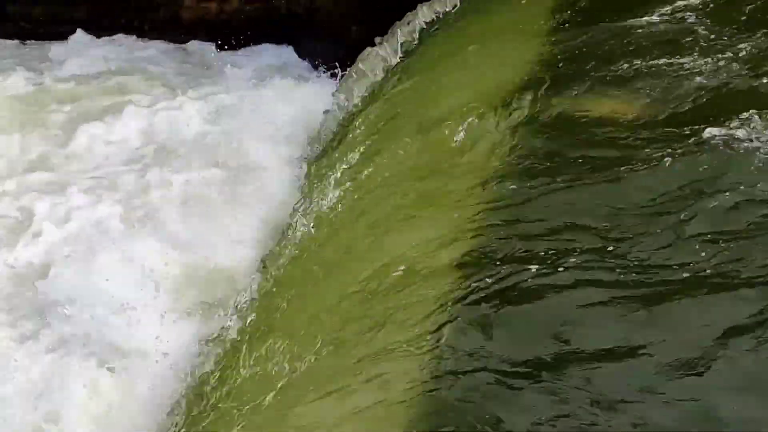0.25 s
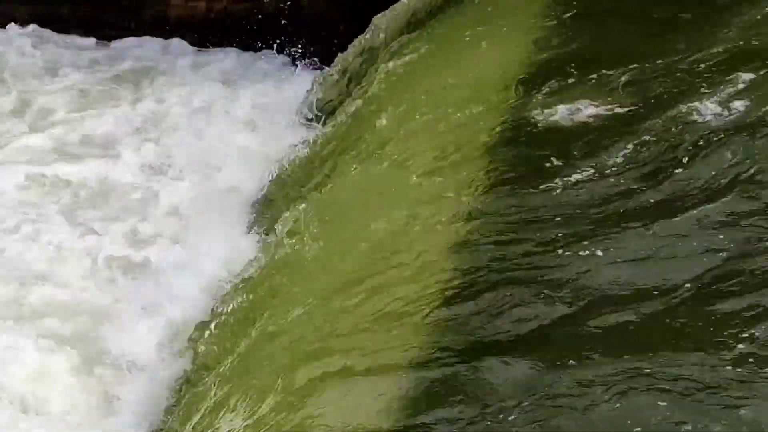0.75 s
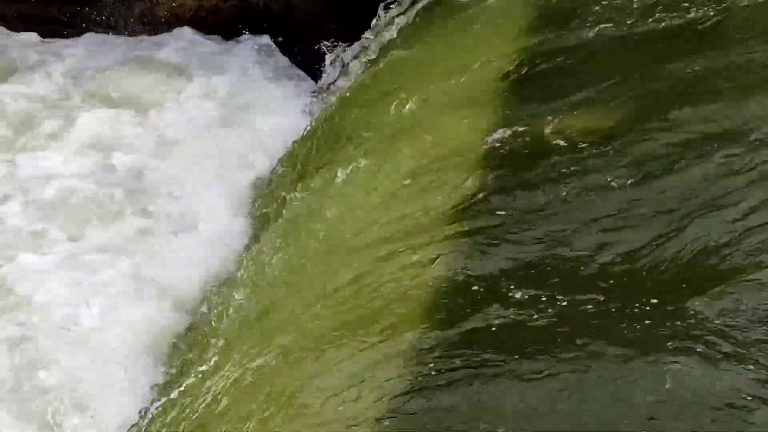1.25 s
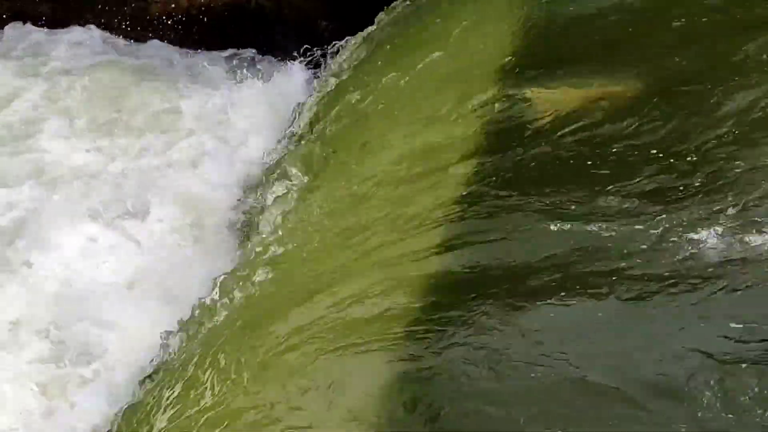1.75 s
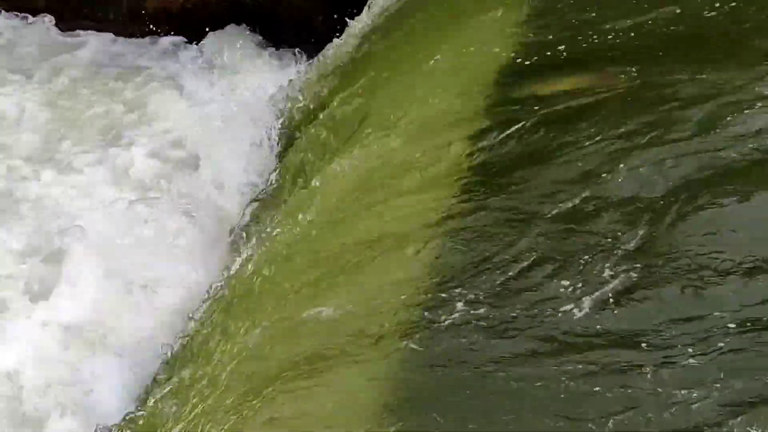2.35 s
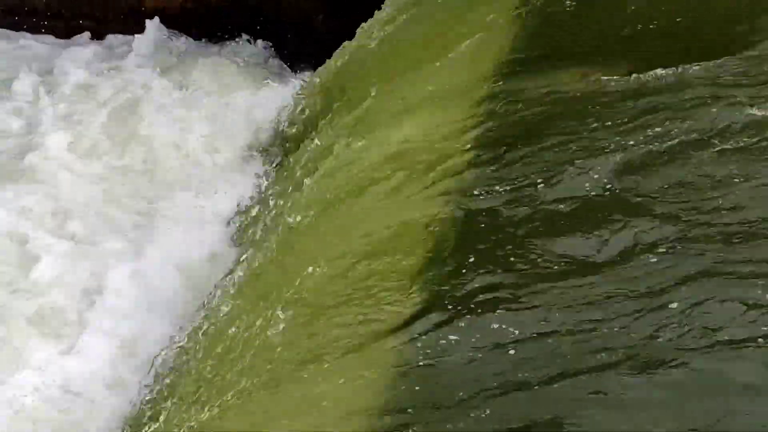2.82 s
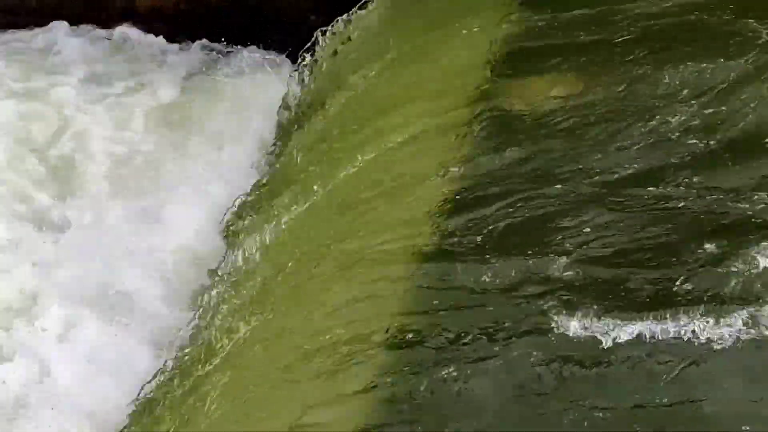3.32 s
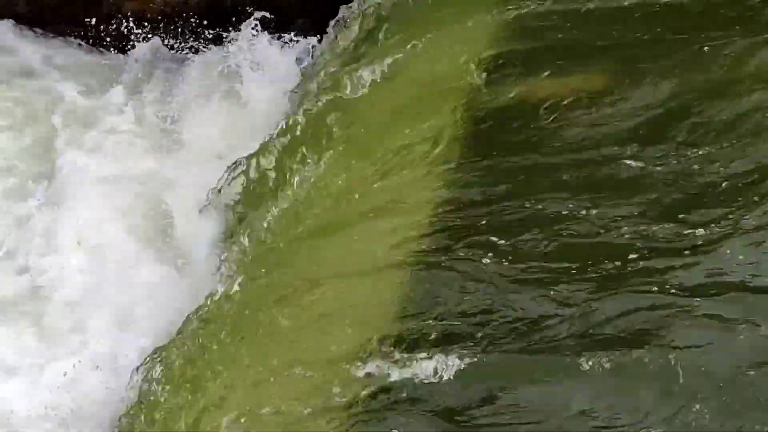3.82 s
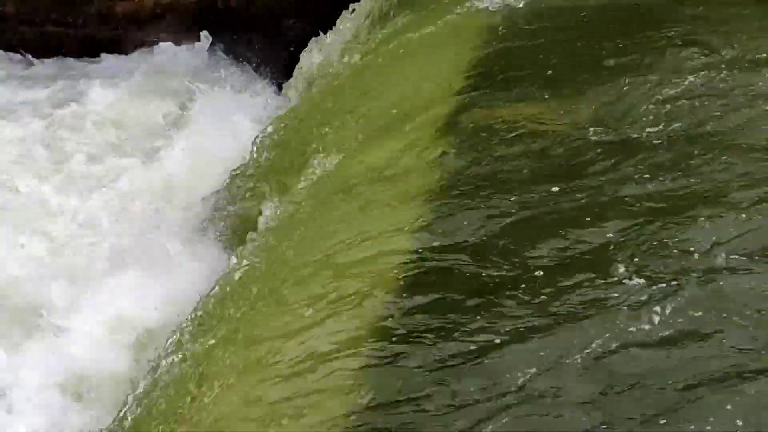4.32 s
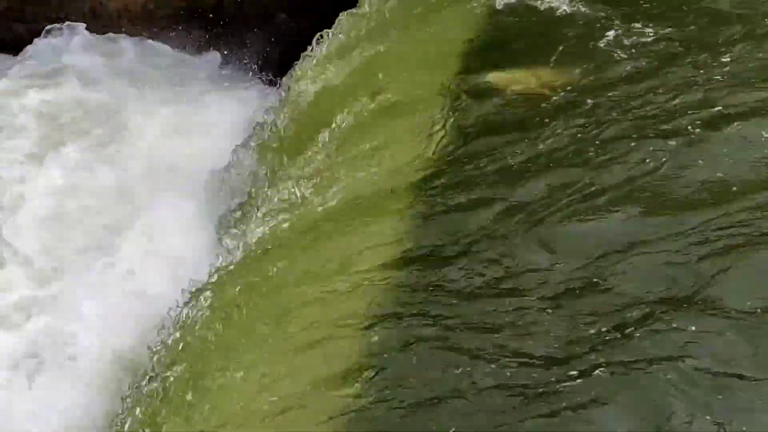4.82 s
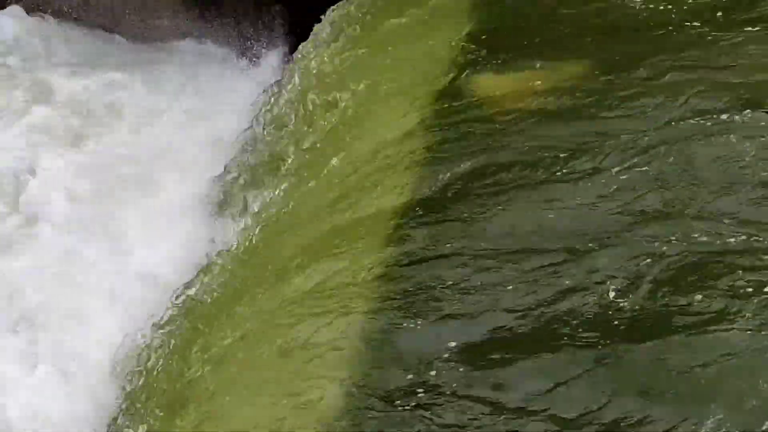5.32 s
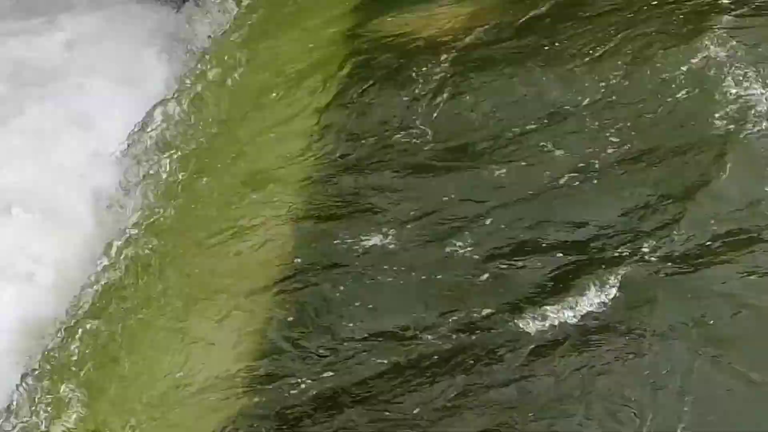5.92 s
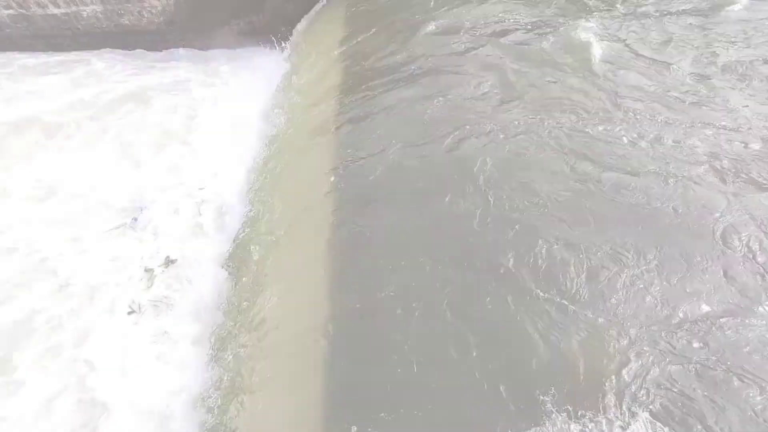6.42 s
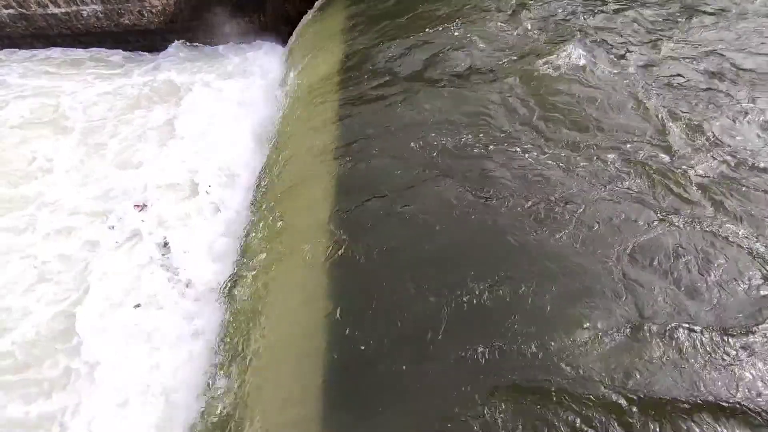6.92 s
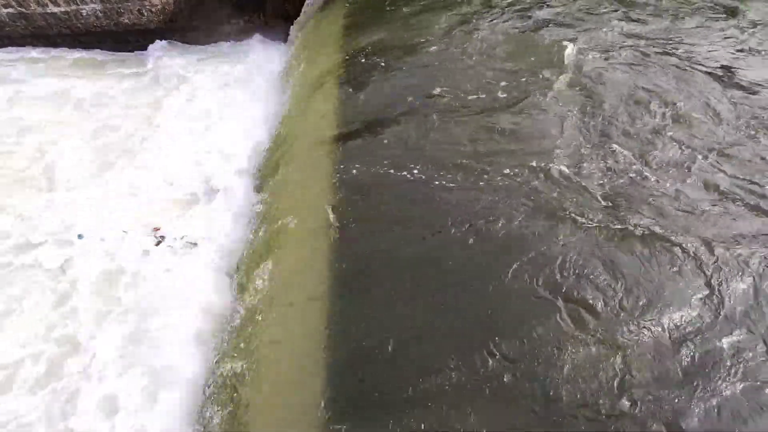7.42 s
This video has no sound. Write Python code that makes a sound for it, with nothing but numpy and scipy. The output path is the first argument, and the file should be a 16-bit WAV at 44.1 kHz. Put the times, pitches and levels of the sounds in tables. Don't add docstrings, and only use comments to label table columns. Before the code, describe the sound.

Water pours heavily into a foaming pool, rumbling low with faint hiss; it fades to near silence around six seconds, then returns.

```python
import sys
import numpy as np
from scipy import signal
from scipy.fft import rfft, irfft, next_fast_len
from scipy.io import wavfile
from scipy.ndimage import uniform_filter1d, minimum_filter1d

SR = 44100
rng = np.random.default_rng(int(sys.argv[2]) if len(sys.argv) > 2 else 0)


def invert_db(x):
    u = np.asarray(x, float) / 20
    return 10 ** u


def unload_audio(sound):
    columns = np.transpose(np.atleast_2d(sound))
    steps = np.round(np.clip(columns, -1, 1) * 32767)
    wavfile.write(sys.argv[1], SR, steps.astype(np.int16))


N = 337806
CUT_S, FADE_S, OVERLAP_S = 6.328, 0.55, 0.013
END = round((CUT_S + OVERLAP_S) * SR)
START = round((CUT_S - OVERLAP_S) * SR)


def rms_one(x):
    return x / np.sqrt(np.mean(x ** 2) + 1e-20)


def at_hz(points, hz):
    points = np.array(points)
    return np.interp(np.log(hz), np.log(points[:, 0]), points[:, 1])


def drift(rate_hz, size):
    step = 40
    r = np.exp(-2 * np.pi * rate_hz * step / SR)
    noise = rng.standard_normal(size // step + 2002)
    slow = signal.lfilter([1], [1, -2 * r, r * r], noise)[2000:]
    return np.interp(np.arange(size) / step, np.arange(len(slow)), rms_one(slow))


def splashes(size, per_s, spread_db, length_s):
    sizes = invert_db(spread_db * np.minimum(rng.exponential(1, size), 4.0))
    landed = rng.random(size) < per_s / SR
    r = np.exp(-1 / (length_s * SR))
    bursts = signal.lfilter([1], [1, -r], sizes * landed + 1e-18)
    return bursts / bursts.mean()


# start_s [s], force of the falling sheet force_db [dB], how deep it drives air depth_db [dB]
PLUNGE = [(0.0, -3, 2), (0.42, 3, -1.5), (0.62, -0.5, -3.5), (0.9, -3, -1.5), (1.5, -3, -4), (1.9, -2, -3),
          (2.4, -3, -1.1), (2.75, 1, -3.5), (3.5, -0.5, 0), (3.9, 1, -0.1), (4.3, 1.1, 2.5),
          (4.65, 2.3, 2.5), (5.1, 0, 1), (5.55, 1.5, 3), (6.2, 2, 6.5), (6.8, 1, 1.5), (7.15, 3.5, 5),
          (7.66, 2.8, 5)]
# near_db [dB], wide_db [dB], force_share [ratio], depth_share [ratio]
VOICES = [
    (-24.5, -26.5, 0.66, 0.78),
    (-15, -17, 0.86, 0.17),
    (-25.5, -24.5, 0.27, -0.58),
    (-34, -35, .05, -0.12),
]


def part_levels(spot):
    start_s, force_db, depth_db = np.transpose(PLUNGE)
    levels = [row[spot] + row[-2] * force_db + row[-1] * depth_db for row in VOICES]
    return np.transpose([start_s] + levels)


# peak_s [s], lift_db [dB], half_length_s [s]
BOILS = [(0.223, 1.5, 0.07), (1.33, 0, 0.13), (1.85, -1, .1), (2.304, 0, 0.17), (2.762, 0, 0.057),
         (3.6, .5, .08), (4.163, 0.5, 0.09), (4.876, 0.5, 0.07), (5.3, 0.5, .07), (5.746, 1.5, 0.049),
         (6.388, 2.5, 0.034), (6.517, 1, .06), (7.02, 0.5, .1), (7.624, 1.5, 0.043)]


def boiling(t):
    return sum(lift_db * np.exp(-((t - peak_s) / half_s) ** 2) for peak_s, lift_db, half_s in BOILS)


# low_hz [Hz], high_hz [Hz]
PARTS = [
    (30, 120),
    (120, 350),
    (350, 1300),
    (1300, 7600),
]


def weir(flow, spectrum, start, size, near_db, own_db, splash_share):
    t = (start + np.arange(size)) / SR
    pad = next_fast_len(size)
    hz = np.maximum(np.arange(pad // 2 + 1) * SR / pad, 1)
    colour = invert_db(at_hz(spectrum, hz)) * (hz < 8000)

    landing_power = splashes(pad, per_s=120, spread_db=3.5, length_s=0.0041)
    landing = np.sqrt(1 - splash_share + splash_share * landing_power)
    deep = rfft(rng.standard_normal(pad)) * colour
    splashy = rfft(rng.standard_normal(pad) * landing) * colour

    flow_s, *levels = np.transpose(flow)
    lifts = []
    for (low_hz, high_hz), level_db in zip(PARTS, levels):
        power = 2 * np.sum(colour[(hz > low_hz) & (hz < high_hz)] ** 2) / pad
        lifts.append(np.interp(t, flow_s, level_db) - 10 * np.log10(power))
    lifts = np.array(lifts)

    together = drift(7.7, size)
    regions = [drift(9.4, size) for part in PARTS]
    boil_db = boiling(t)
    heave_db = 0.97 * drift(11, size) + 0.5 * together

    middles = np.log2([85, 200, 600, 1700])
    centres = np.arange(np.log2(30), np.log2(8000), 1 / 3)
    octave = np.clip(np.log2(hz), centres[0], centres[-1])
    out = np.zeros(size)
    for centre in centres:
        shape = np.cos(np.pi / 2 * np.clip(3 * (octave - centre), -1, 1)) ** 2
        weights = np.array([np.interp(centre, middles, row) for row in np.eye(len(PARTS))])
        bright = weights[-1] + 0.54 * weights[-2]
        flicker_db = boil_db + near_db * (weights @ regions) + own_db * drift(26, size)
        swell_db = weights @ lifts + bright * flicker_db + (1 - bright) * heave_db
        source = splashy if bright > 0.3 else deep
        out += invert_db(swell_db) * irfft(source * shape, pad)[:size]
    return out


# pitch_hz [Hz], level_db [dB per Hz]
CLOUD_NEAR = [(20, -39), (27, -38), (40, -27), (68, -9), (110, -4.5), (169, -0.5), (263, -2.5), (330, -6.5),
              (403, -14), (482, -14.5), (618, -19.5), (960, -24), (1040, -27.5), (1220, -30)]
# pitch_hz [Hz], level_db [dB per Hz]
SPRAY_NEAR = [(1390, -39.5), (1690, -31), (1910, -33), (2150, -32.5), (2450, -34.5), (2720, -36.5),
              (2830, -39.5), (3520, -39.5), (3580, -46), (3680, -42.5), (4100, -47), (5150, -40.5),
              (5650, -46), (5840, -43.5), (5900, -38.5), (6900, -33), (7500, -31)]


def near_spot():
    water = weir(part_levels(0), CLOUD_NEAR + SPRAY_NEAR, 0, END, near_db=0.46, own_db=0.53, splash_share=0.097)
    return water * np.minimum(np.arange(END)[::-1] / (FADE_S * SR), 1)


# [dB the gain drops, negative rises]
SURGES = [(0.116, -7, 188, 1), (0.152, -7.5, 192, 0.5), (0.355, -7, 176, 0.5), (0.404, -13, 200, 1),
          (0.580, -5, 234, -2), (0.641, -7.5, 233, 0.5), (0.698, -10.5, 220, 1), (1.814, -7.5, 214, -2),
          (2.723, -5, 243, 0), (2.811, -9, 188, 2), (2.891, -8, 174, 0.5), (3.068, -9.5, 199, -1),
          (3.252, -7, 247, 3), (3.346, -9, 224, 0.5), (3.420, -6, 220, -0.5), (3.494, -5.5, 200, -1),
          (3.665, -13, 200, 1.5), (3.859, -7.5, 187, 2.5), (4.192, -13, 189, -1.5), (4.244, -10, 190, 0),
          (4.295, -8.5, 187, 4), (4.361, -7, 191, 1), (4.617, -15, 149, -1), (4.669, -5, 144, 4.5),
          (4.795, -22, 158, -0.5), (4.915, -7, 170, 0), (5.012, -4.5, 147, 1), (5.117, -7, 170, -1),
          (5.179, -8.5, 180, 0), (5.234, -10.5, 179, 0), (5.327, -9.5, 181, 0), (5.394, -4, 171, 2),
          (5.436, -9, 160, 2), (5.529, -8, 174, 2), (5.569, -4.5, 180, 1.5), (5.812, -9, 147, -0.5),
          (5.861, -6.5, 171, 1.5), (5.9, -12, 149, 1), (6.584, -14, 221, -2.5), (6.709, -9, 190, -2.5),
          (6.739, -11.5, 156, 3), (6.887, -10, 148, 0), (6.907, -7.5, 119, -1.5), (6.99, -6.5, 153, -0.5),
          (7.070, -15, 171, -1.5), (7.15, -11.5, 159, 0), (7.212, -5.5, 145, -2), (7.271, -7.5, 144, 4.5),
          (7.325, -12, 200, 2.5), (7.603, -3, 156, -0.5)]


def thuds():
    out, t = np.zeros(N), np.arange(N) / SR
    for peak_s, level_db, pitch_hz, duck_db in SURGES:
        span = slice(max(int((peak_s - 0.05) * SR), 0), int((peak_s + 0.03) * SR))
        cycles = (t[span] - peak_s) * pitch_hz
        swell = np.exp(-(cycles / np.where(cycles < 0, 1.8, 1.1)) ** 2)
        out[span] += invert_db(level_db) * np.cos(2 * np.pi * cycles) * swell
    return out


# start_s [s], length_s [s], from_hz [Hz], to_hz [Hz], level_db [dB]
BIRD = [
    (3.335, .065, 3400, 3500, -45),
    (3.705, .09, 3100, 3440, -43.5),
]


def bird():
    out = np.zeros(N)
    for start_s, length_s, from_hz, to_hz, level_db in BIRD:
        size, at = int(length_s * SR), int(start_s * SR)
        rise = np.minimum(np.linspace(0, 1.4, size), 1)
        pitch_hz = from_hz + (to_hz - from_hz) * rise
        breath = np.minimum(4 * np.hanning(size), 1)
        out[at:at + size] += invert_db(level_db) * breath * np.sin(2 * np.pi * np.cumsum(pitch_hz) / SR)
    return out


# pitch_hz [Hz], level_db [dB per Hz]
CLOUD_WIDE = [(20, -46.5), (27, -43.5), (40, -23), (68, -5), (110, -3), (160, 0), (263, -3), (330, -9),
              (390, -16.5), (480, -20), (700, -21), (960, -24.5), (1040, -30.5), (1120, -37.5)]
# pitch_hz [Hz], level_db [dB per Hz]
SPRAY_WIDE = [(1280, -31), (1600, -35.5), (2060, -33.5), (2230, -31.5), (2550, -36), (2850, -38.5),
              (3480, -40), (3620, -45.5), (4500, -47.5), (5000, -46.5), (5750, -48), (6000, -38),
              (7050, -35), (7500, -40)]


def wide_spot():
    size = N - START
    water = weir(part_levels(1), CLOUD_WIDE + SPRAY_WIDE, START, size, near_db=-0.2, own_db=0.5, splash_share=0.17)
    return water * np.minimum(np.arange(size) / (FADE_S * SR), 1)


def scene():
    near = near_spot()
    out = thuds() + bird()
    out[:END] += near
    out[START:] += wide_spot()
    return out[None]


def gain_control(x):
    attack_s, recovery_s = 0.005, 0.12
    t = np.arange(N) / SR
    gain_db = np.zeros(N)
    for peak_s, level_db, pitch_hz, duck_db in SURGES:
        since_s = np.maximum(t - peak_s, 0)
        onset = 1 - np.exp(-(since_s / attack_s) ** 2)
        gain_db -= duck_db * onset * np.exp(-since_s / recovery_s)
    return x * invert_db(gain_db)


def limiter(x):
    ceiling_db, release_db_s = -2.7, 80
    release_db = release_db_s * np.arange(N) / SR
    over_db = np.maximum(20 * np.log10(np.abs(x) + 1e-9) - ceiling_db, 0)
    held_db = np.maximum.accumulate(over_db + release_db) - release_db
    held_db = -minimum_filter1d(-np.maximum(held_db, 0), size=177)
    return x * invert_db(-uniform_filter1d(held_db, size=177))


def cut_top(x):
    cutoff_hz, edge_hz, edge_db = 7500, 79, -19.5
    pad = next_fast_len(N + SR)
    hz = np.arange(pad // 2 + 1) * SR / pad
    above = np.clip((hz - cutoff_hz) / edge_hz, 0, 3)
    return irfft(rfft(x, pad) * invert_db(edge_db * above ** 2), pad)[:N]


def top_cut(x):
    return signal.sosfilt(signal.butter(12, 8750, fs=SR, output="sos"), x)


def record(dry):
    x = gain_control(dry[0])
    x = limiter(x)
    x = cut_top(x)
    return top_cut(x[None])


dry = scene()
out = record(dry)
unload_audio(out)
```